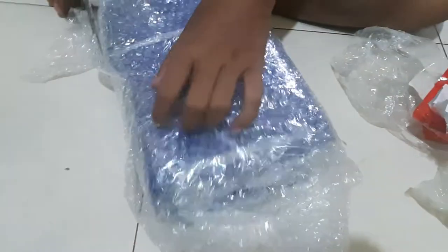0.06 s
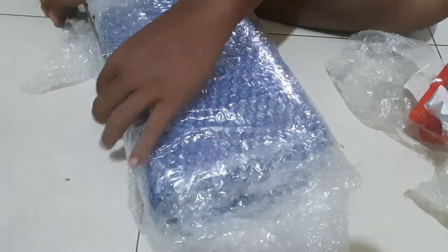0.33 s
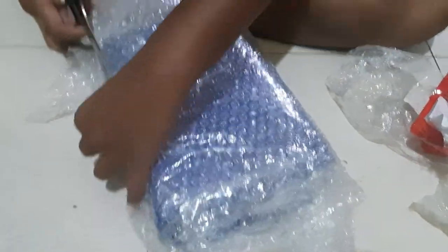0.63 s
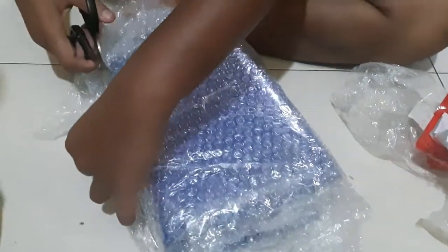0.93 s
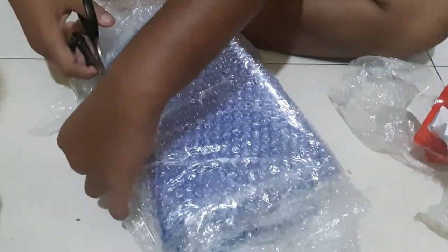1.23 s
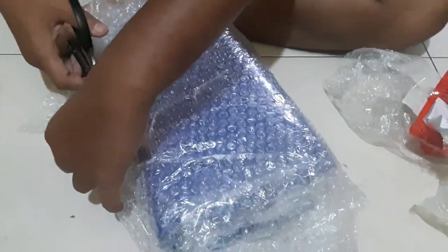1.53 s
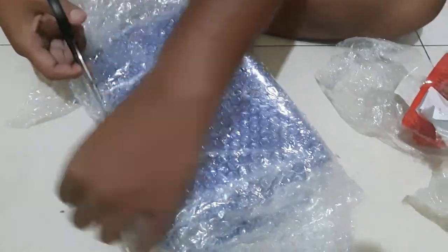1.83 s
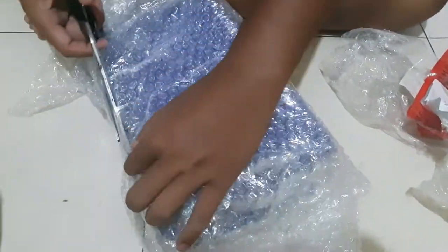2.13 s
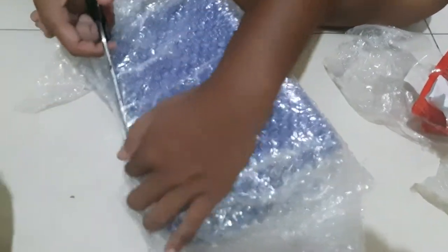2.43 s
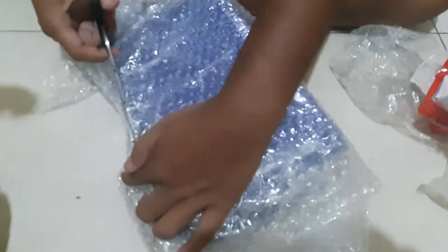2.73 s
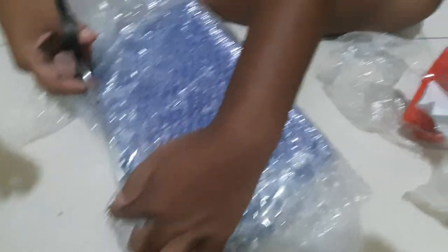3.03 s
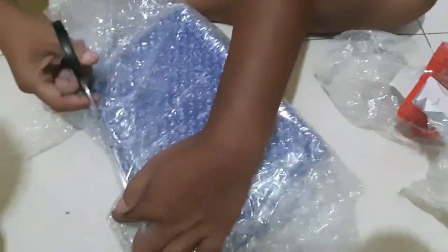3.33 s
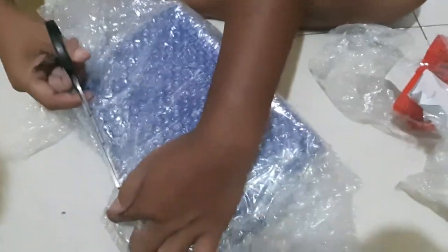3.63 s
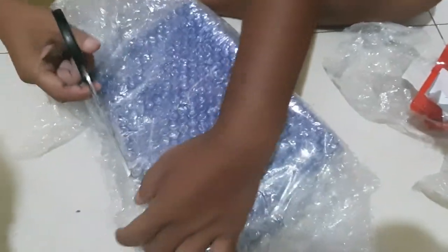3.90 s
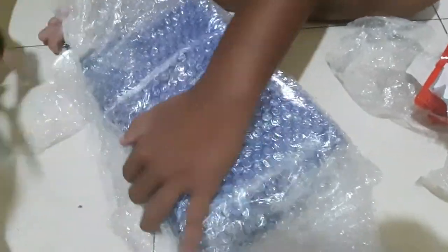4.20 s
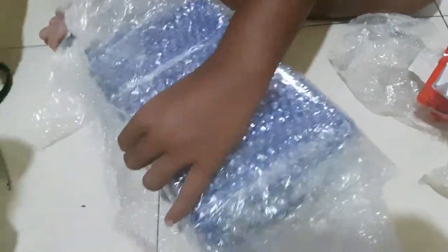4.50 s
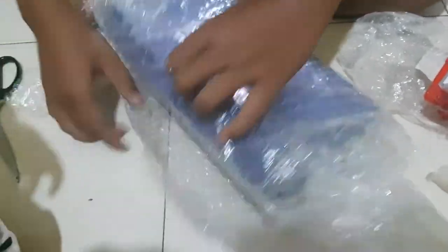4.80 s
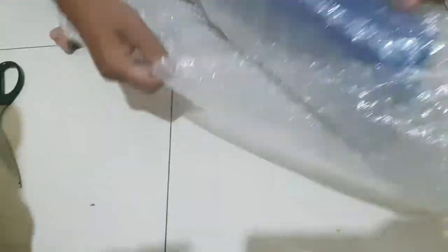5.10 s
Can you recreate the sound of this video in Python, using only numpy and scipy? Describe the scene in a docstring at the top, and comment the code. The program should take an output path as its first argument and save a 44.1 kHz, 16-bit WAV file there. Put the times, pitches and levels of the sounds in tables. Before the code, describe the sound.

Bubble wrap crinkles softly under a hand, then grows louder, with sharp little crackles over the low shuffle of a parcel. Scissors knock, creak faintly and snap shut twice, and between the snips something briefly brushes the microphone on the left. Near the end the scissors bounce on the tiled floor with a bright metallic clatter while the plastic keeps rustling. The sound is close, with a slight room echo.

```python
"""Bubble wrap smoothed by hand and cut with scissors on a tiled floor, close to a handheld recorder.
The film crinkles and snaps as creases buckle; the parcel shuffles, taut bubbles ping, the handles knock.
Soft bumps come in at 1.5 s; the blades snap shut at 1.7 s and creak by stick-slip at 2.7 s.
Around 3 s a low hum wavers and something swipes the left microphone port twice.
The blades creak again and shut at 3.7 s; from 4.3 s the scissors bounce and ring on the tiles."""
import sys
import numpy as np
from scipy import signal
from scipy.fft import rfft, irfft, next_fast_len
from scipy.io import wavfile
from scipy.ndimage import uniform_filter1d

SR = 44100
rng = np.random.default_rng(int(sys.argv[2]) if len(sys.argv) > 2 else 0)


def inscribe(sig):
    """Save sig as 16-bit PCM at rate SR to the path in sys.argv[1].

    A 1-D sig is mono; a 2-D sig holds one channel per row.
    Samples are clipped to [-1, 1] before scaling.
    """
    pcm = np.round(np.clip(np.atleast_2d(sig).T, -1, 1) * 32767)
    wavfile.write(sys.argv[1], SR, pcm.astype(np.int16))


N = 231613
TIME = np.arange(N) / SR

# firmness of the hold on the film, as steady crinkling: t/s, level/dB
GRIP = [(0, -59.5), (.16, -58), (.34, -71), (.42, -57), (.68, -60.5), (.82, -57), (1.04, -56.5),
        (1.14, -48), (1.85, -48), (2.6, -46), (3.15, -45), (3.4, -53.5), (3.85, -49), (4.8, -49.5),
        (5.25, -46)]


def amp(db):
    """Decibels to gain."""
    return 10 ** (np.asarray(db) / 20)


def unit(x):
    """Scale to rms 1."""
    return x / np.sqrt(np.mean(x ** 2) + 1e-20)


def read(points, hz):
    """Interpolate a table over log frequency."""
    f, value = np.transpose(points)
    return np.interp(np.log(hz + 1), np.log(f + 1), value)


def follow(rows):
    """Interpolate each column of a time table at every sample."""
    s, *columns = np.transpose(rows)
    return [np.interp(TIME, s, c) for c in columns]


def add(mix, s, sound):
    """Mix a sound in at s seconds."""
    part = mix[:, round(s * SR):][:, :sound.shape[1]]
    part += sound[:, :part.shape[1]]


def colour(x, points, size=2048):
    """Minimum-phase filter of unit power; points: f/Hz, gain/dB."""
    gain = unit(amp(read(points, abs(np.fft.fftfreq(size, 1 / SR)))))
    log_response = np.conj(signal.hilbert(np.log(gain + 1e-6)))
    taps = np.fft.ifft(np.exp(log_response)).real
    return signal.oaconvolve(x, taps[None], axes=1)[:, :x.shape[1]]


def split(x, hz, kind):
    """Zero-phase low-pass or high-pass."""
    return signal.sosfiltfilt(signal.butter(2, hz, kind, fs=SR, output="sos"), x)


def pan(db):
    """Port gains for a left-right difference."""
    return amp(np.array([[db], [-db]]) / 2)


def ports(x, lag_samples=7):
    """Sound from the floor reaches the right port late."""
    return np.array([x, np.pad(x, (lag_samples, 0))[:len(x)]])


def hiss(size, apart, lag_samples=7):
    """Stereo noise; the power share 'apart' is independent between ports."""
    common = ports(rng.standard_normal(size), lag_samples)
    return np.sqrt(1 - apart) * common + np.sqrt(apart) * rng.standard_normal((2, size))


def burst(t60_s, apart, size=4096, lag_samples=7):
    """Decaying noise with the energy of its envelope."""
    shape = amp(-60 * np.arange(size) / SR / t60_s)
    return unit(hiss(size, apart, lag_samples) * shape) * np.sqrt(np.mean(shape ** 2))


def hump(hz, db_per_octave):
    """Spectrum of a broad resonance, falling on both sides."""
    return [(hz / 16, -4 * db_per_octave), (hz, 0), (hz * 4, -2 * db_per_octave)]


def ring(modes, size):
    """Impulse response of modes: f/Hz, level/dB, t60/s."""
    t = np.arange(size) / SR
    return sum(amp(db - 60 * t / t60) * np.sin(2 * np.pi * hz * t) for hz, db, t60 in modes)


def blows(rows, rise_s, gain_db):
    """Each blow rings one damped mode."""
    out = np.zeros((2, N))
    attack = 1 - np.exp(-TIME[:SR] / rise_s)
    for s, db, hz, t60, side_db in rows:
        add(out, s, pan(side_db) * ports(ring([(hz, db + gain_db, t60)], SR) * attack))
    return out


def handling(sag_db_per_s=5, relax_db_per_s=187, firm_db=-52):
    """Grip and pushes add in power; returns crinkle, hollow body and fizz levels in dB."""
    # pushes of the hand: t/s, length/s, rise/s, level/dB, body/dB re level, fizz/dB re level
    strokes = [(-.03, 0.028, .02, -44, -24, -5.5), (0.373, 0.028, 0.031, -56.5, -14, 0),
               (.46, 0.12, .05, -57, -21, -6), (1.168, 0.089, 0.032, -46, -17, -3.5),
               (1.383, 0.093, .02, -48.5, -5, -6), (1.668, 0.018, .015, -38, -7, -1),
               (1.737, 0.04, .02, -45, -25, -3), (1.887, 0.11, 0.061, -37.5, -14.5, -2.5),
               (2.104, 0.038, 0.025, -41.5, -19.5, -1.5), (2.222, 0.075, 0.032, -41, -25, -3.5),
               (2.375, .11, 0.04, -35.5, -19.5, -4), (2.524, 0.1, 0.025, -40, -20, -4),
               (2.698, 0.32, .02, -41.5, -18, -6), (3.216, 0.089, 0.075, -43.5, -12.5, 3.5),
               (3.432, .055, .008, -49.5, -12, 4), (3.683, 0.033, 0.0082, -45, -0.5, 5),
               (3.885, 0.12, 0.044, -41, -14.5, -6), (4.046, 0.25, 0.046, -38, -22, -4.5),
               (4.297, 0.29, 0.061, -43, -16.5, -10), (4.784, .08, 0.031, -51.5, -7, 4),
               (5.027, 0.11, .1, -41.5, -8, 0)]
    grip, = follow(GRIP)
    hollow = grip - 15.5 + 1.7 * np.minimum(grip - firm_db, 0)  # a light grip loses the hollow sound
    power = amp([grip, hollow, grip - 3]) ** 2
    for s, length, rise_s, db, body_db, fizz_db in strokes:
        t = TIME[:SR // 2] - min(s, 0)
        fall_db = sag_db_per_s * t + relax_db_per_s * np.maximum(t - length, 0)
        push = np.minimum(t / rise_s, 1) * amp(db - fall_db)
        add(power, max(s, 0), (amp([[0], [body_db], [fizz_db]]) * push) ** 2)
    return 10 * np.log10(power)


def crinkle(creases_per_s=1700, pitches=60, spread_db=2.5, slide_db=-5, body_db=14, fizz_db=5.5):
    """Tiny creases buckle at many pitches over the hiss of sliding film."""
    film_spectrum = [(180, -47), (300, -1.5), (494, -7.5), (634, -11), (801, -4), (946, -3.5), (1190, -7.5),
                     (1930, -8), (2650, -3), (3130, -5.5), (4990, -2), (7820, -13.5), (10600, -9),
                     (15000, -18), (16000, -13)]  # f/Hz, level/dB
    grains = np.zeros((2, N))
    for hz in np.linspace(1200, 14000, pitches):
        t60_s = 0.0082 * rng.uniform(0.96, 1.6)
        grain = colour(burst(t60_s, apart=0.89, size=1024), hump(hz, 14.5))
        for when, chance in rng.random((round(creases_per_s / pitches * N / SR), 2)):
            add(grains, when * N / SR, amp(spread_db * min(-np.log(chance), 3)) * grain)
    film = unit(colour(unit(grains) + amp(slide_db) * hiss(N, apart=0.19), film_spectrum))
    low, high = split(film, 1900, "low"), split(film, 7500, "high")
    level, hollow, fizz = handling()
    return amp(level) * (film - low - high) + amp(fizz + fizz_db) * high + amp(hollow + body_db) * low


def rumble(gain_db=-1, drag_db_per_db=0.32, air_db=-74):
    """The parcel shuffles, deeper when leaned on and louder when pushed, over quiet room air."""
    leaning = [(0, -70.5, 6), (.3, -71, -2), (.62, -81, -9), (.9, -68.5, 3), (1.45, -57.5, 10),
               (1.95, -64, 5.5), (2.7, -57.5, -1.5), (3.45, -57, 4), (4.2, -61.5, 0), (4.56, -55.5, -12),
               (4.74, -63, 1), (5, -64.5, -0.5), (5.14, -53.5, -9), (5.25, -63, -1)]  # parcel shifting on the floor: t/s, level/dB, thud/dB re level
    shuffle_spectrum = [(20, -4), (45, -5.5), (90, -5.5), (170, 1.5), (300, -7), (500, -15), (900, -27.5),
                        (3000, -71)]  # f/Hz, level/dB
    air_spectrum = [(20, -20), (80, -7), (150, 0), (300, 5), (600, -11), (1100, 1), (1800, -47),
                    (16000, -15)]  # f/Hz, level/dB
    lean_db, thud_db = follow(leaning)
    push_db = handling()[0] - follow(GRIP)[0]
    level = amp(lean_db + drag_db_per_db * push_db + gain_db)
    shuffle = colour(hiss(N, apart=0.039), shuffle_spectrum, size=8192)
    deep = split(shuffle, 130, "low")
    air = amp(air_db) * colour(hiss(N, apart=0.19), air_spectrum)
    return level * (shuffle - deep + amp(thud_db) * deep) + air


def tick(db, hz, t60_s, side_db):
    """One dry snap: a noise burst through a broad resonance."""
    return amp(db) * pan(side_db) * colour(burst(t60_s, apart=1.0), hump(hz, 10.5))


def crackles(gain_db=-7, small_per_s=32, small_hz=5400):
    """Large creases give way singly; lesser ones snap at random, riding above the crinkle level."""
    creases = [(.1425, -31.5, 4450, 4), (.3083, -42.5, 4800, -2), (0.54, -33.5, 5500, -1),
               (1.2542, -12.5, 4650, -3), (1.395, -26, 9000, 3), (1.4019, -20, 3830, -4),
               (1.459, -24.5, 4600, -4), (1.69, -12.5, 4800, 7), (1.6934, -17, 4200, 2),
               (2.415, -22, 4800, -5), (2.556, -15, 4700, 7), (2.5605, -17.5, 4840, -7),
               (2.749, -21, 3700, -4), (2.7541, -17.5, 5200, 1), (3.021, -22.5, 3570, -16),
               (3.1299, -23, 8200, -2), (3.4177, -23, 4500, -2), (3.5573, -21.5, 3380, -3),
               (3.6192, -23, 4630, 3), (3.8527, -24.5, 4650, -3), (3.86, -26, 4970, 2),
               (3.952, -23, 4240, 0)]  # loudest snaps: t/s, level/dB, centre f/Hz, left-right/dB
    out, crinkle_db = np.zeros((2, N)), handling()[0]
    for s, db, hz, side_db in creases:
        add(out, s, tick(db + gain_db, hz, t60_s=0.012, side_db=side_db))
    for when, size, pitch, side in rng.random((round(small_per_s * N / SR), 4)):
        db = crinkle_db[int(when * N)] + 14 + 2 * min(-np.log(size), 3)
        hz = small_hz * 2 ** (pitch - 0.5)
        add(out, when * N / SR, tick(db + gain_db, hz, t60_s=0.0071, side_db=7 * (2 * side - 1)))
    return out


def pings():
    """Taut bubbles, flicked, ring with a pitch."""
    flicks = [(.2222, -33, 4380, 0.015, 3), (.5396, -26.5, 5730, 0.011, 1), (1.736, -22, 5900, .01, -2),
              (3.1292, -30, 8500, .0073, -3)]  # t/s, level/dB, f/Hz, t60/s, left-right/dB
    return blows(flicks, rise_s=0.00022, gain_db=-4)


def handles(rise_s=0.00091, gain_db=3.5, side_db=-1):
    """Knocks ring the scissor handles; harder ones bring out the upper modes."""
    knocks = [(.389, -55.5, 0.95, 3), (1.402, -36.5, 0.844, 0.5), (1.688, -24, 1.01, -4),
              (1.691, -31, 1.12, 9), (1.709, -34, 0.97, 5), (3.2133, -26.5, 0.86, -16),
              (3.2213, -27, 0.99, -11), (3.6399, -26.5, 1.12, -2), (3.6622, -29, 1.04, -13),
              (3.6692, -32.5, 1.3, -8), (3.6966, -21, 1.08, 0.5)]  # t/s, level/dB, pitch ratio set by the grip, upper-mode gain/dB
    handle_modes = [(348, 0.5, 0.024), (699, -2.5, 0.017), (1025, -3.5, .018), (3110, -11, 0.085)]  # f/Hz, level/dB, t60/s
    out = np.zeros((2, N))
    attack = 1 - np.exp(-TIME[:SR // 4] / rise_s)
    for s, db, ratio, hard_db in knocks:
        modes = [(hz * ratio, mode_db + hard_db * (k > 0), t60)
                 for k, (hz, mode_db, t60) in enumerate(handle_modes)]
        add(out, s, amp(db + gain_db) * pan(side_db) * ports(ring(modes, len(attack)) * attack))
    return out


def bumps():
    """Soft, damped blows on the recorder and the floor."""
    thuds = [(1.506, -43, 75, 0.038, -14), (2.9856, -16.5, 410, 0.0059, -15),
             (3.4913, -27, 133, 0.0069, -25.5), (3.7, -38, 117, 0.08, 1)]  # t/s, level/dB, f/Hz, t60/s, left-right/dB
    return blows(thuds, rise_s=0.00091, gain_db=4)


def snips(gain_db=-4):
    """The blades break through and hit their stop; returns direct sound and room send."""
    closures = [(1.7422, -8, 0.0095, -16), (1.744, -8.5, 0.014, -15), (3.696, -1.5, 0.0053, -6),
                (3.698, -7.5, 0.016, -8.5)]  # t/s, level/dB, t60/s, room send/dB
    snip_spectrum = [(100, -55), (400, -18.5), (1000, -23), (2000, -9.5), (3500, -4), (4900, 3), (6500, 0),
                     (7800, -12.5), (9800, 3), (12000, -14.5), (16000, -14)]  # f/Hz, level/dB
    direct, send = np.zeros((2, 2, N))
    for s, db, t60, room_db in closures:
        snap = amp(db + gain_db) * colour(burst(t60, apart=0.26), snip_spectrum)
        add(direct, s, snap)
        add(send, s, amp(room_db) * snap)
    return direct, send


def creaks(settle_s=0.008, fade_db=14, side_db=3, jitter=0.049):
    """Stick-slip at the blades: near-regular slips slow and fade, ringing the handles."""
    slides = [(2.677, 0.075, -33.5, 358, 320), (3.598, 0.027, -34.5, 422, 390)]  # t/s, length/s, level/dB, first slip rate/Hz, last slip rate/Hz
    body_modes = [(372, 2.5, 0.024), (674, -8, 0.029), (1010, -3, 0.027), (1150, -20, 0.022),
                  (2770, -10, .012), (3500, -20, .012)]  # f/Hz, level/dB, t60/s
    out = np.zeros((2, N))
    for s, length, db, first_hz, last_hz in slides:
        t = np.arange(0, length, 1 / SR)
        waver = unit(uniform_filter1d(rng.standard_normal(len(t)), 100))
        rate_hz = last_hz + (first_hz - last_hz) * np.exp(-t / settle_s)
        cycles = np.cumsum(rate_hz * (1 + jitter * waver)) / SR
        slips = np.diff(np.floor(cycles), prepend=-1) * amp(-fade_db * (t / length) ** 2)
        sound = signal.fftconvolve(slips, ring(body_modes, 2048))
        add(out, s, amp(db) * pan(side_db) * ports(sound / abs(sound).max()))
    return out


def hum(start_s=2.95, end_s=3.38, hz=182, gain_db=-52, roughness=0.38, side_db=-3):
    """A low tone swells, wavers and fades."""
    out, t = np.zeros((2, N)), np.arange(0, end_s - start_s, 1 / SR)
    arch = np.sqrt(abs(np.sin(np.pi * t / t[-1])))
    slow = signal.butter(2, 30, fs=SR, output="sos")
    waver = unit(signal.sosfilt(slow, rng.standard_normal((2, len(t)))))
    tone = (1 + roughness * (waver[0] + 1j * waver[1])) * np.exp(2j * np.pi * hz * t)
    add(out, start_s, amp(gain_db) * pan(side_db) * ports(arch * tone.real))
    return out


def brushing(swell_db=7, edge_s=0.0097, right_db=-20):
    """Dry hiss at the left port; each swipe presses harder until it lets go."""
    swipes = [(3.163, 0.221, -29.5), (3.423, .042, -25.5)]  # t/s, length/s, level/dB
    spectrum = [(100, -11), (300, -27), (600, -26), (1500, -13), (3000, 5), (5000, 5.5), (7500, -9),
                (11000, -0.5), (16000, -13)]  # f/Hz, level/dB
    level = np.zeros(N)
    for s, length, db in swipes:
        t = TIME - s
        touch = np.clip(np.minimum(t, length + edge_s - t) / edge_s, 0, 1)
        level += touch * amp(db - swell_db * (1.5 - np.clip(t / length, 0, 1)))
    return level * amp([[0], [right_db]]) * colour(hiss(N, apart=0.72), spectrum)


def rim_tick(gain_db=-7):
    """The swipe catches on the rim of the port."""
    catches = [(3.3578, -12, 2300, .0036, 15.5)]  # t/s, level/dB, centre f/Hz, t60/s, left-right/dB
    out = np.zeros((2, N))
    for s, db, hz, t60, side_db in catches:
        add(out, s, tick(db + gain_db, hz, t60, side_db))
    return out


def clatter(crack_db=-5, second_blade_s=0.006, second_blade_db=-8, ring_db=-15, mode_count=140):
    """At each bounce the blades land in turn with a bright crack and ring in a new mix of modes."""
    bounces = [(4.3283, -5.5, 0.029), (4.3875, -10.5, 0.045), (4.43, -13.5, 0.037), (4.447, -17, 0.022),
               (4.454, -11.5, .028), (4.5027, -19.5, .014), (4.5207, -7.5, .032), (4.5243, -5, .018),
               (4.5311, -8.5, 0.061), (4.558, -9.5, 0.029), (4.5836, -15.5, .013), (4.6023, -21, .022),
               (4.6164, -24, .012), (4.6358, -30, .016)]  # t/s, level/dB, contact t60/s
    steel_spectrum = [(3000, -21), (4700, -12), (7500, -27), (9700, -12), (10050, 5), (10450, 1),
                      (10750, -13), (11400, -5), (12100, 4), (12600, -10), (14200, -3), (14900, -15),
                      (15900, -22)]  # strength of the blade modes: f/Hz, level/dB
    contact_spectrum = [(100, -29), (250, -12), (600, -25), (2000, -20.5), (4500, -4), (9500, -1),
                        (10300, 7), (10900, 3), (12000, 4), (13500, 0.5), (15000, 1), (16000, 1.5)]  # steel on tile: f/Hz, level/dB
    cracks, rings = np.zeros((2, 2, N))
    modes_hz = np.linspace(3000, 15800, mode_count) + rng.uniform(-45, 45, mode_count)
    t60s_s = 0.17 * rng.uniform(0.48, 1.3, mode_count)
    modes = np.array([ring([(hz, read(steel_spectrum, hz), t60)], 16000)
                      for hz, t60 in zip(modes_hz, t60s_s)])
    for s, db, t60 in bounces:
        add(cracks, s, amp(db + crack_db) * burst(t60, apart=0.72, lag_samples=4))
        second = amp(db + crack_db + second_blade_db) * burst(t60, apart=0.93, lag_samples=4)
        add(cracks, s + second_blade_s, second)
        struck = rng.standard_normal((2, mode_count)) @ modes
        add(rings, s, amp(db + ring_db) * struck / np.sqrt(mode_count))
        # even a light touch rings the tips, so the last small bounces are the most pitched
        tip_hz, tip_db = 11450 * rng.uniform(0.93, 1.02), -25 + 0.21 * db
        add(rings, s, ports(ring([(tip_hz, tip_db, 0.028)], SR // 2), lag_samples=4))
    return colour(cracks, contact_spectrum) + rings


def room(x, early_db=9, early_t60_s=0.17, gap_s=0.003, paths=4, paths_per_s=110):
    """Close reflections, then a tail that lasts longest near 3.7 kHz."""
    decay_times = [(200, 0.3), (1400, 0.67), (3700, 0.93), (10000, 0.13), (16000, 0.33)]  # f/Hz, t60/s
    hz, t, noise = signal.stft(rng.standard_normal((paths, 2, SR // 2)), SR, nperseg=256)
    decay = amp(-60 * t / read(decay_times, hz)[:, None]) + amp(early_db - 60 * t / early_t60_s)
    tails = signal.istft(noise * decay, SR, nperseg=256)[1]
    tails *= TIME[:tails.shape[-1]] > gap_s
    out = np.zeros((2, N))
    for k, tail in enumerate(tails):
        # the input crossfades in turn over the tails, moving on about 110 times a second
        away = (TIME * paths_per_s - k + 1) % paths - 1
        share = np.cos(np.pi / 2 * np.minimum(abs(away), 1))
        out += signal.fftconvolve(x * share, tail / np.linalg.norm(tail[0]), axes=1)[:, :N]
    return out


def scene():
    """Sum of all sources; swipes, rumble and hum get no room."""
    film, steel = crinkle(), clatter()
    pops = crackles() + rim_tick() + pings()
    dull = handles() + bumps() + creaks()
    snap, snap_send = snips()
    wet = room(amp(-2.5) * film + amp(-15.5) * pops + amp(-8) * steel + amp(-8.5) * dull + snap_send)
    return film + pops + steel + dull + snap + wet + brushing() + rumble() + hum()


def record(dry, low_cut_hz=55, high_cut_hz=15850):
    """Each port's own colour, then bass cut and band limit."""
    port_balance = [(60, 2), (250, 3.5), (600, 5.5), (1100, 4.5), (2200, 1), (4800, -5.5), (5700, 2.5),
                    (7200, -5), (9500, -2), (11500, 0), (13500, 5), (15800, 17.5)]  # f/Hz, left-right/dB
    size = next_fast_len(N + SR // 2)
    tilt_db = read(port_balance, np.fft.rfftfreq(size, 1 / SR))
    heard = irfft(rfft(dry, size) * amp(np.array([tilt_db, -tilt_db]) / 2), size)[:, :N]
    heard = signal.sosfilt(signal.butter(3, low_cut_hz, "high", fs=SR, output="sos"), heard)
    band_limit = signal.firwin(511, high_cut_hz, window=("kaiser", 9), fs=SR)
    return signal.oaconvolve(heard, band_limit[None], "same")


dry = scene()
out = record(dry)
inscribe(out)
```